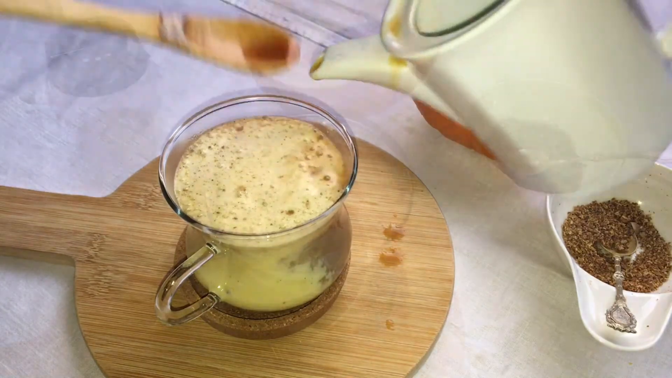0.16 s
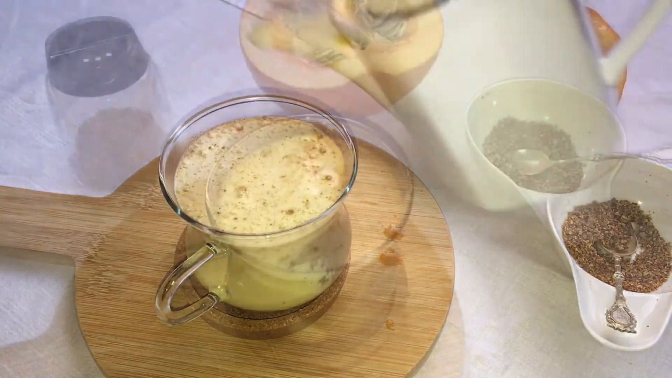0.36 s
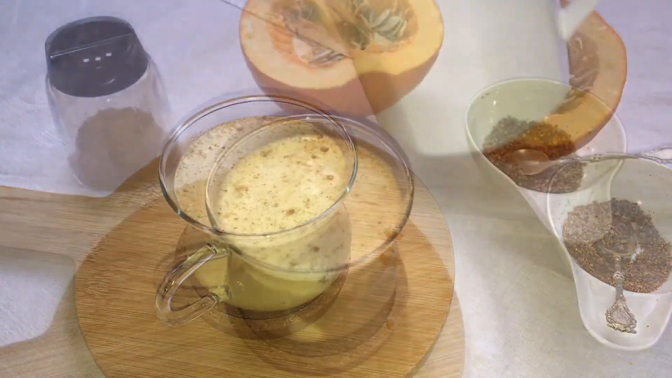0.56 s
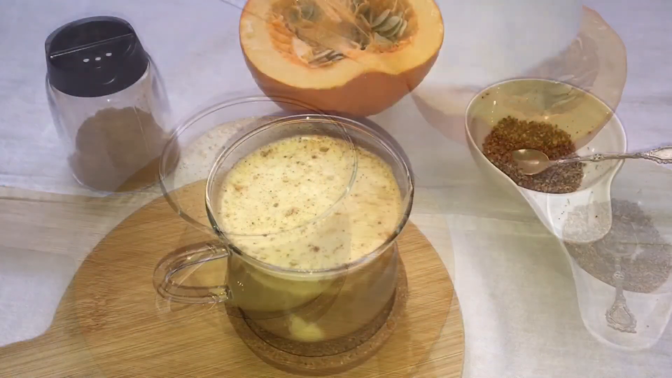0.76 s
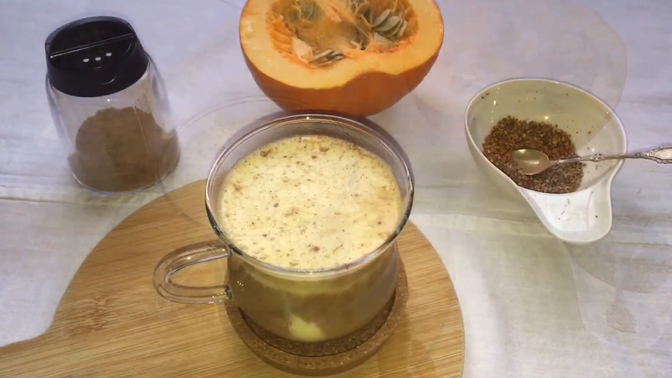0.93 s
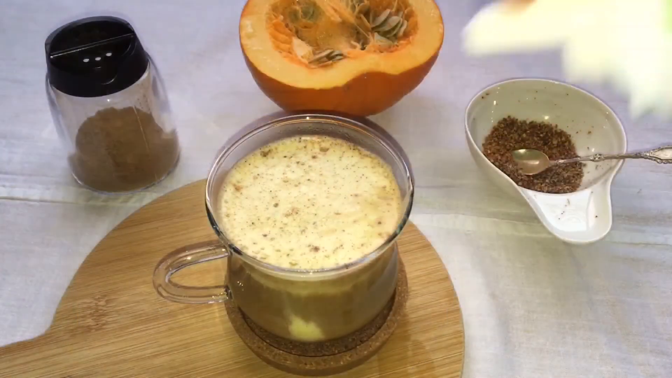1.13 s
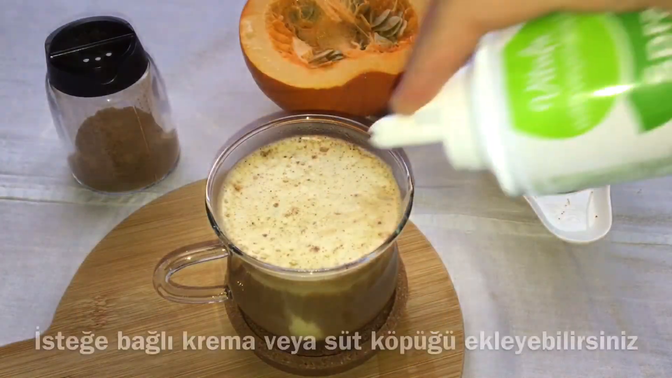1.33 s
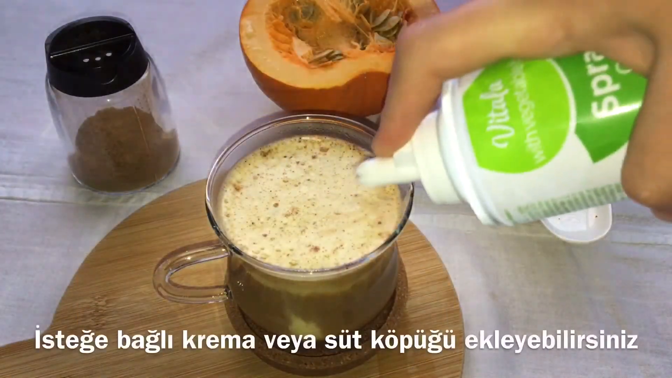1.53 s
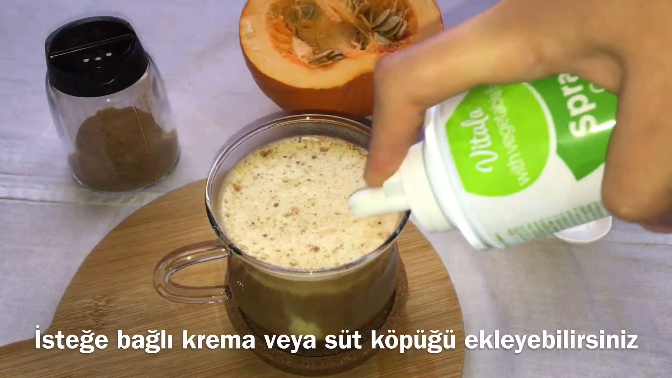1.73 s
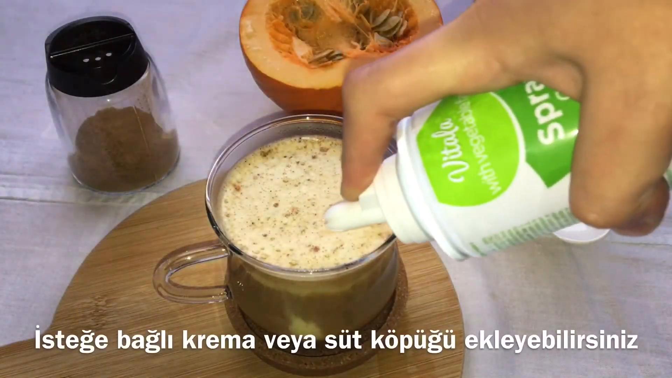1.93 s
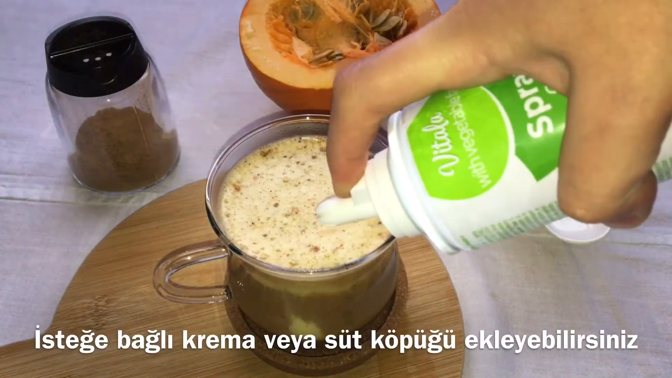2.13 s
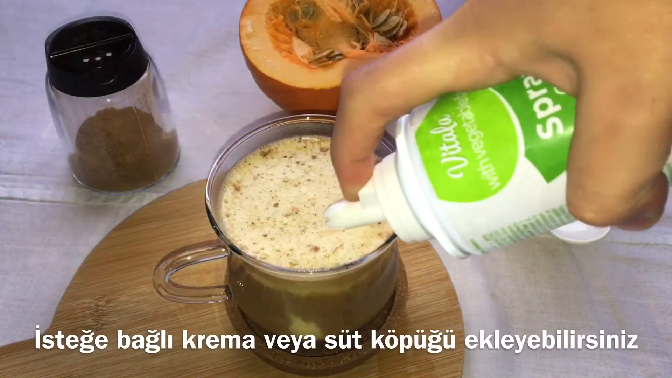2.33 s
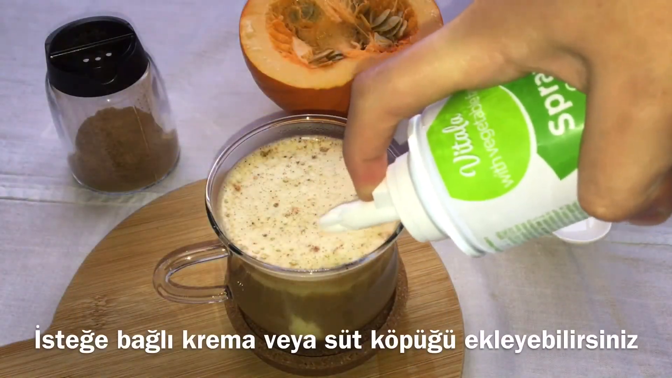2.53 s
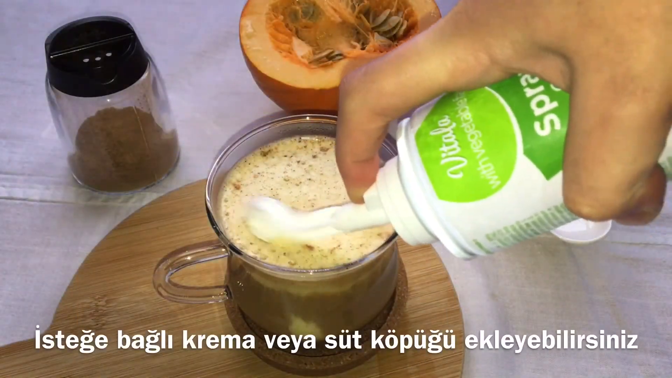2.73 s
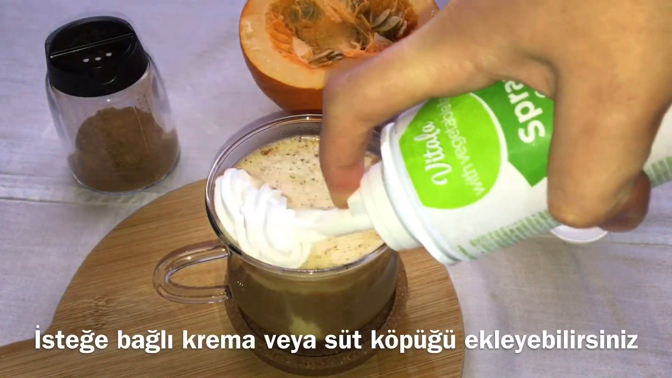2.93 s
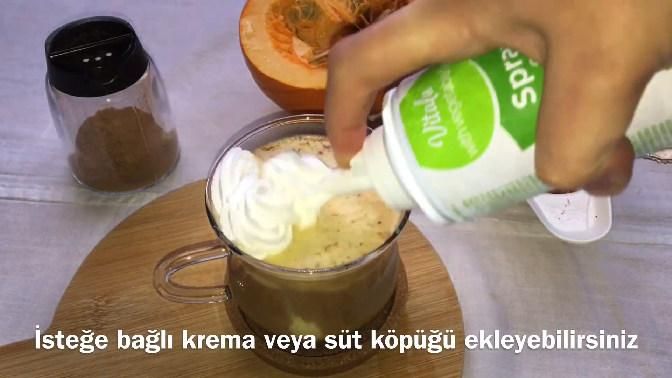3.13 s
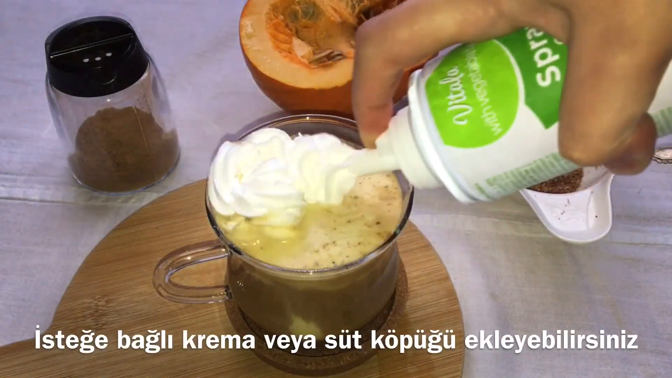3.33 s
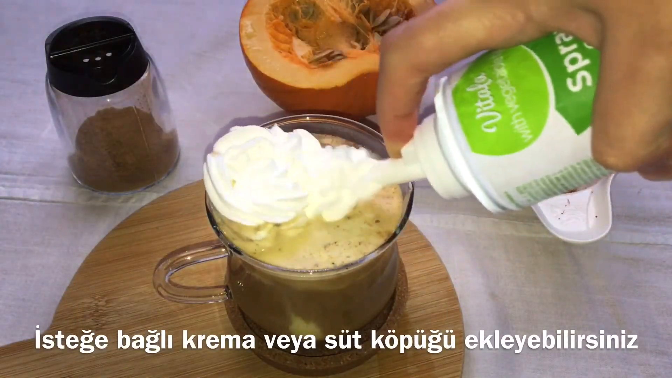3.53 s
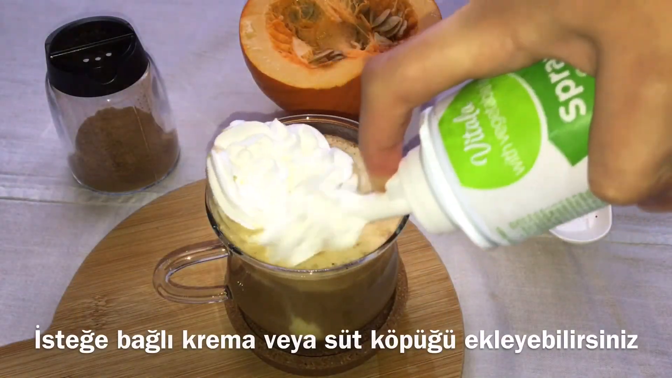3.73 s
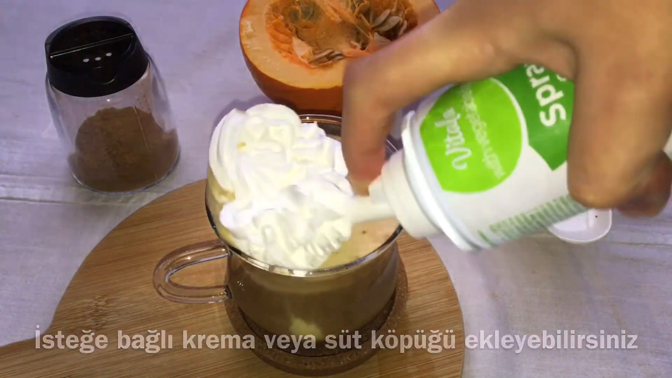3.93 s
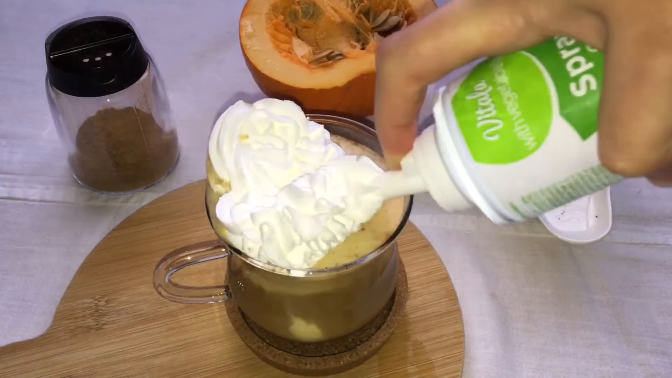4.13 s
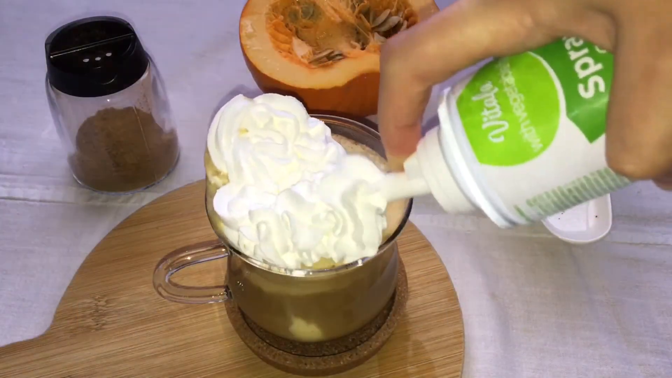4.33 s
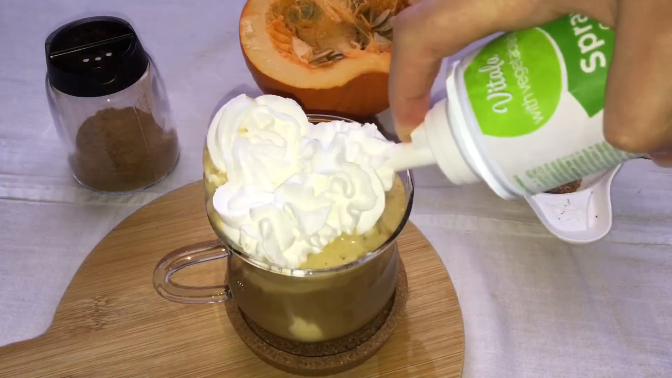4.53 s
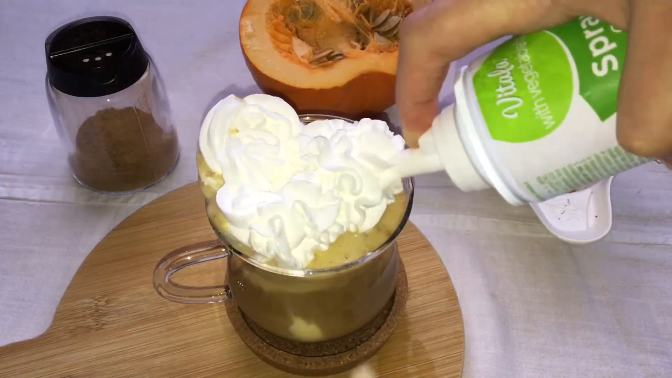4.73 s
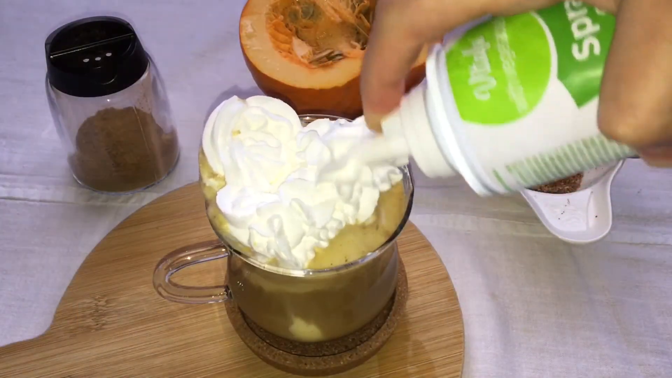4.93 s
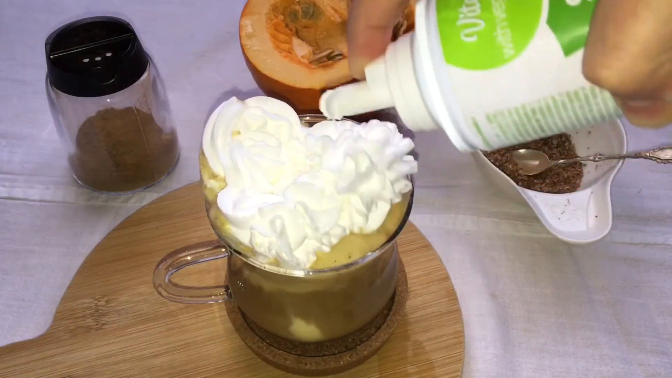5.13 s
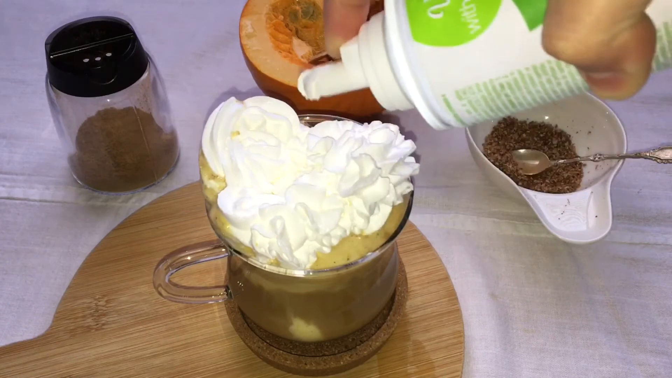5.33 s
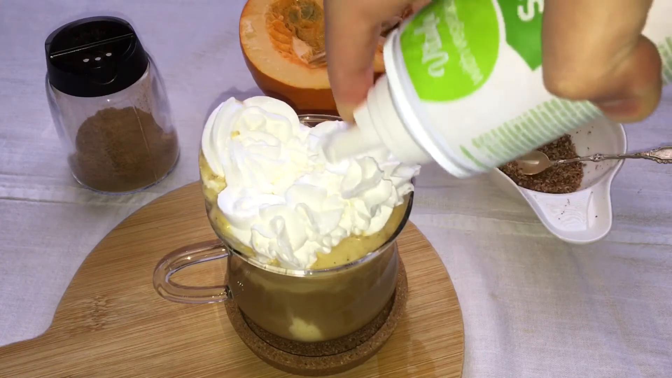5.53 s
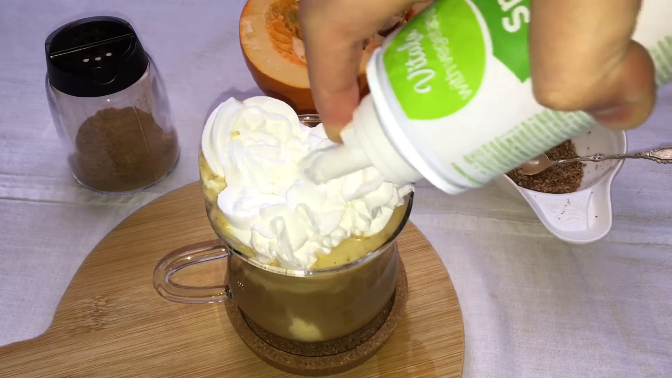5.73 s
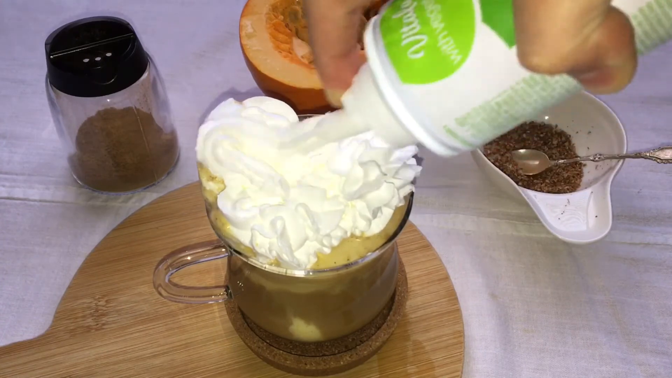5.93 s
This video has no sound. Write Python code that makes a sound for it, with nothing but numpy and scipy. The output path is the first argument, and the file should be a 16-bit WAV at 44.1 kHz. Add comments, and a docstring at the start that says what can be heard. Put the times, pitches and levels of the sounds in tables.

```python
"""Whipped cream is sprayed from an aerosol can onto a drink in a glass mug, in a small kitchen.
Over faint air, rumble and a wavering drone, crockery first clicks, slides and knocks (damped modes,
contact noise and filtered grit), while the table thuds dully (low modes excited by soft blows).
A faint squeak of narrow-band noise swells and fades. Then the valve is pressed twice: gas hisses as
coloured noise, foam fizzes as dense random clicks, and gas pockets sputter and spit as short pops."""
import sys
import numpy as np
from scipy import signal
from scipy.fft import rfft, irfft, next_fast_len
from scipy.io import wavfile
from scipy.ndimage import uniform_filter1d

SR = 44100
rng = np.random.default_rng(int(sys.argv[2]) if len(sys.argv) > 2 else 0)


def to_wav(sig):
    """Store sig (one row per channel, or 1-D mono) as 16-bit WAV at the path in sys.argv[1].

    Samples outside -1..1 are clipped; the rate is SR.
    """
    pcm = np.clip(np.atleast_2d(sig), -1, 1) * 32767
    pcm = np.round(pcm).astype(np.int16)
    wavfile.write(sys.argv[1], SR, pcm.T)  # frames by channels


N = 267246
TIME = np.arange(N) / SR   # s

# Spectral tables give relative density; the level of each source is set separately.
# kitchen air: [f/Hz, density/dB per Hz]
AIR_SPECTRUM = [(240, -44.5), (400, -5.5), (673, -4), (738, -7.5), (1120, -7), (1240, -9), (2290, -14),
                (3680, -16.5), (15500, -20)]
# kitchen rumble: [f/Hz, density/dB per Hz]
RUMBLE_SPECTRUM = [(15, -24), (30, -10), (75, 5.5), (100, -8), (125, 2), (185, -1.5), (250, -3),
                   (350, -9.5), (450, -18.5), (520, -31), (1500, -65.5)]
# deep background drone: [f/Hz, density/dB per Hz]
DRONE_SPECTRUM = [(20, -27), (40, -13.5), (48.5, 4), (58, -11), (85, -13.5), (140, -45), (400, -91)]
# swelling and sinking of the drone: [t/s, level/dB]
DRONE_LEVEL = [(1.7, -70), (2.1, -64.5), (3.2, -63), (4.2, -78.5), (6.05, -73)]
AIR_DB, RUMBLE_DB = -72, -64

# narrow band of the faint squeak: [f/Hz, density/dB per Hz]
SQUEAK_SPECTRUM = [(400, -70), (1200, -12), (1280, -4), (1380, -16), (3000, -72)]

# soft bumps against the table: [t/s, level/dB]
TABLE_BUMPS = [(0.908, -52), (0.955, -54.5), (1.222, -52.5), (1.254, -56.5), (1.535, -41), (1.552, -36.5)]
# modes of the table: [f/Hz, level/dB, t60/s]
TABLE_MODES = [(124.2, -3.5, 0.53), (166, -1, 0.31), (207, -2.5, 0.4), (262, -7, 0.32),
               (332.3, -12.5, 0.37), (385, -19, 0.52), (480, -29.5, 0.38), (613, -25.5, 0.4),
               (770, -37, 0.34)]

# a hard click of crockery: [t/s, level/dB]
CROCKERY_CLICKS = [(0.4667, -37)]
# modes the click excites: [f/Hz, level/dB, t60/s]
CLICK_MODES = [(766, -14, 0.04), (1810, -2.5, 0.012), (2150, -24, 0.18), (2870, -1, 0.015),
               (3080, -4.5, 0.045), (3790, -4.5, 0.051), (5400, -3, .008), (8200, -22, .02)]
# the pot is set down and rocks once: [t/s, level/dB]
POT_KNOCKS = [(0.8434, -35.5), (0.8752, -52)]
# modes of the pot: [f/Hz, level/dB, t60/s]
POT_MODES = [(670, -13, 0.11), (803, 9.5, 0.027), (1729, 0.5, 0.064), (2810, -1, 0.035), (3050, -13, .045),
             (3650, -22, .02), (4430, -30, .015), (6400, -16, 0.014)]
# snap of hard crockery contact: [f/Hz, density/dB per Hz]
SNAP_SPECTRUM = [(200, -15), (800, -6), (1700, -6), (3500, 2), (6000, 4), (7500, -5), (9000, -23),
                 (15000, -30)]
# crockery sliding: [t/s, level/dB, decay time/s, main resonance f/Hz]
CROCKERY_SLIDES = [(0.464, -49, 0.008, 1760), (0.483, -59, 0.082, 2150), (0.61, -66.5, 0.053, 2020),
                   (0.652, -64.5, 0.1, 1960), (0.749, -58.5, 0.02, 2050), (0.9, -67.5, 0.15, 1250),
                   (0.926, -58.5, 0.019, 1190)]
# grit of a slide: [f/Hz, density/dB per Hz]
GRIT_SPECTRUM = [(200, -2), (700, 1.5), (1400, -1.5), (2100, -4), (2700, -6.5), (3800, -7.5), (6000, -10),
                 (9500, -14.5), (15000, -24)]
# lesser resonances that every slide excites: [f/Hz, width/Hz, level/dB]
SLIDE_RESONANCES = [(770, 90, 2), (3080, 140, 5)]

# the finger presses the valve: [start t/s, end t/s, full flow level/dB, initial foam fizz level/dB]
VALVE_PRESSES = [(2.415, 4.801, 0, -40.5), (5.657, 6.1, -2.65, -41.5)]
# the finger eases off, or bears down (negative loss): [start t/s, end t/s, loss of flow level/dB]
FINGER_EASINGS = [(2.4, 2.584, 4), (2.578, 2.70, 14.5), (3.065, 3.157, -1), (4.478, 4.555, 9),
                  (4.564, 4.9, 4.5), (5.73, 5.77, 5)]
# the valve opens from a trickle (relative to full flow); the finger takes a while to shift
TRICKLE_DB, OPENING_S, FINGER_S = -36, 0.077, 0.04

# gas hiss: [f/Hz, density/dB per Hz]
HISS_SPECTRUM = [(700, -36), (1200, -5), (2200, 3), (3000, 2), (4200, -4.5), (4900, -6), (6500, -0.5),
                 (9500, -1), (11400, 2.5), (13000, -3), (15700, -7.5)]
# resonances of the gas jet in the nozzle: [f/Hz, width/Hz, level/dB]
JET_RESONANCES = [(4200, 350, 11.5), (11200, 980, 5)]
# foam fizz: [f/Hz, density/dB per Hz]
FIZZ_SPECTRUM = [(1500, -15.5), (3000, -14.5), (3800, 1), (5000, -2), (6500, -1), (9500, -1), (12000, -8),
                 (15700, -7.5)]
# colour laid on the sputtering pops: [f/Hz, density/dB per Hz]
SPUTTER_SPECTRUM = [(30, -35), (100, -21), (300, -4.5), (520, -17), (850, -9.5), (1000, -2.5), (1300, -3),
                    (2000, 1.64), (2450, 0.6), (2750, -5), (4000, -4.5), (7000, -22), (15000, -22.5)]
# low rush of the moving cream: [f/Hz, density/dB per Hz]
RUSH_SPECTRUM = [(25, -26), (60, -17.5), (130, -5.5), (220, 0), (340, 3), (430, -2), (520, -7.5),
                 (680, -3.5), (900, -14), (2000, -13), (6000, -70)]
# fixed peaks and hollows in the colour of the spray: [f/Hz, width/Hz, level/dB]
SPRAY_PEAKS = [(507, 37, -4), (800, 97, -9), (1000, 76, 4.5), (1125, 107, -5), (1210, 170, 4.5),
               (2450, 55, 2.5), (3580, 500, 3.5), (5310, 190, 4.5), (6620, 150, 0)]
# moving resonance of the hollow in the cream at the nozzle: [t/s, f/Hz]
HOLLOW_PITCH = [(2.45, 1210), (3.15, 2200), (3.5, 2490), (3.7, 1940), (4.8, 1420), (6.05, 1220)]
# loudest pockets spitting from the nozzle: [t/s, pop peak level/dB before the fixed peaks and hollows, f/Hz]
LOUD_SPITS = [(2.48, -35.5, 1580), (2.716, -25, 1970), (3.073, -22, 1900), (3.092, -24, 2000),
              (3.113, -23, 2130), (3.2052, -23, 2500), (3.681, -22.5, 2820), (3.990, -19, 3480),
              (4.064, -26, 1600), (4.437, -21, 3520), (4.5453, -21.5, 1900), (4.5783, -16.5, 1900),
              (4.6238, -20.5, 1820), (4.7185, -17, 2420), (4.7823, -22, 2420), (5.678, -47, 3050),
              (5.7187, -27.5, 1690), (5.762, -26, 1250), (5.783, -25, 1500),  (6.0515, -20.5, 1520)]

HISS_DB, SPUTTER_DB = -41.5, -37.5        # at 0 dB flow; sputter also at the usual hollow pitch
FIZZ_FOLLOWS, SPUTTER_FOLLOWS = 1, 0.91   # dB per dB of flow
FIZZ_GROWTH_DB_PER_S = 3                  # the longer a press lasts, the more the foam fizzes
# a tighter, higher hollow sputters louder
SPUTTER_DB_PER_OCTAVE, USUAL_HOLLOW_HZ = 1.5, 1900
# spread of pocket sizes at 0 dB flow, and its growth per dB of flow lost
POCKET_SPREAD_DB, SPREAD_GROWTH = 3.5, 0.096
# chance spits: rate, mean level above the sputter, and scatter of level and pitch
SPITS_PER_S, SPIT_OVER_DB, SPIT_SCATTER_DB, SPIT_SCATTER_OCTAVES = 10, 12, -1.7, 0.1
# foam damps the jet: dB per dB of fizz above the level at which it rings as listed
JET_DAMPING, JET_FOAM_DB = 0.91, -37.5

ROOM_T60_S, ROOM_DB = 0.33, -10.5   # decay below the treble; feed from the spray to the room
# hollows in the microphone's response: [f/Hz, width/Hz, level/dB]
MICROPHONE_RESPONSE = [(4980, 670, -2.5), (7730, 740, -3), (10380, 790, -3.5)]
CUTOFF_HZ = 15700


def from_db(db):
    """Level definition: amplitude gain is 10 to the power of dB/20."""
    return 10 ** (np.asarray(db) / 20)


def rms_one(x):
    """Normalisation: scale to unit root-mean-square amplitude."""
    return x / np.sqrt(np.mean(x ** 2) + 1e-20)


def in_time(rows):
    """Linear interpolation of a tabulated quantity over time."""
    t, values = np.transpose(rows)
    return np.interp(TIME, t, values)


def colour(x, spectrum):
    """Minimum-phase filtering: a folded cepstrum gives a causal response of the stated magnitude."""
    size = next_fast_len(N + SR // 4, True) * 2
    hz, db = np.transpose(spectrum)
    bins_hz = np.arange(size // 2 + 1) * SR / size
    gain = from_db(np.interp(np.log(bins_hz + 1), np.log(hz), db))
    cepstrum = irfft(np.log(gain))[:size // 2]
    cepstrum[1:] *= 2
    response = np.exp(rfft(cepstrum, size))
    return irfft(rfft(x, size) * response)[:N]


def noise(spectrum):
    """Spectral shaping: white noise coloured by a filter, at unit rms."""
    return rms_one(colour(rng.standard_normal(N), spectrum))


def drift(rate_hz):
    """Low-pass filtering: two equal poles turn white noise into a smooth fluctuation of unit rms."""
    r = np.exp(-2 * np.pi * rate_hz / SR)
    return rms_one(signal.lfilter([1], [1, -2 * r, r * r], rng.standard_normal(N)))


def ring(clicks, hz, t60):
    """Impulse response: a unit click sets a damped mode of height 1 ringing."""
    r, w = from_db(-60 / (t60 * SR)), 2 * np.pi * hz / SR
    # the tiny offset avoids vanishingly small numbers
    return signal.lfilter([1, -r * np.cos(w)], [1, -2 * r * np.cos(w), r * r], clicks + 1e-18)


def bursts(per_s, spread_db, limit=4.57):
    """Random point process: clicks of either sign, mostly small and a few large."""
    sizes = from_db(spread_db * np.minimum(rng.exponential(1, N), limit))
    return (rng.random(N) < per_s / SR) * sizes * rng.choice([-1, 1], N)


def steady(x):
    """Gain control: division by the running rms (about 50 ms) holds the level near 1."""
    return x / np.sqrt(uniform_filter1d(x ** 2, size=2200) + 1e-12)


def bell(hz, width, db):
    """Second-order resonance: filter coefficients of one peak or hollow."""
    half, g, c = np.pi * width / SR, from_db(db / 2), -2 * np.cos(2 * np.pi * hz / SR)
    return [1 + half * g, c, 1 - half * g], [1 + half / g, c, 1 - half / g]


def bells(x, rows):
    """Cascaded filters: the responses of successive peaks and hollows multiply."""
    for row in rows:
        x = signal.lfilter(*bell(*row), x)
    return x


def struck(hits, modes, rise_cycles):
    """Modal superposition: each blow starts damped sines that build up over some cycles."""
    out = np.zeros(N)
    for s, db in hits:
        start = round(s * SR)
        age = TIME[:min(SR, N - start)]
        for hz, mode_db, t60 in modes:
            swell = 1 - np.exp(-age * hz / rise_cycles)
            fade = np.exp(-np.log(1000) * age / t60)
            mode = swell * fade * np.sin(2 * np.pi * hz * age)
            out[start:][:len(age)] += from_db(db + mode_db) * mode
    return out


def background():
    """Incoherent addition: independent noises form faint air, low rumble and a wavering drone."""
    air = from_db(AIR_DB) * noise(AIR_SPECTRUM)
    rumble = from_db(RUMBLE_DB) * noise(RUMBLE_SPECTRUM)
    drone = from_db(in_time(DRONE_LEVEL)) * noise(DRONE_SPECTRUM)
    return air + rumble + drone


def squeak(peak_s=2.235, width_s=0.089, peak_db=-74):
    """Amplitude modulation: a bell-shaped envelope makes narrow-band noise swell and fade."""
    envelope = np.exp(-((TIME - peak_s) / width_s) ** 2)
    return from_db(peak_db) * envelope * noise(SQUEAK_SPECTRUM)


def table_thuds():
    """Soft excitation: slow-rising blows set the table's low modes ringing."""
    return struck(TABLE_BUMPS, TABLE_MODES, rise_cycles=2.7)


def snaps(hits, snap_db, snap_s=0.0013):
    """Impulsive contact: hard surfaces give a broadband crack about a millisecond long."""
    force = np.zeros(N)
    for s, db in hits:
        force += from_db(db + snap_db) * (TIME > s) * np.exp(-np.abs(TIME - s) / snap_s)
    return force * noise(SNAP_SPECTRUM)


def slides(grain_db=0.5, ring_width_hz=200, ring_db=12):
    """Friction excitation: gritty scrapes catch quickly and die away, each with its own resonance."""
    grit = bells(colour(bursts(4000, grain_db), GRIT_SPECTRUM), SLIDE_RESONANCES)
    out = np.zeros(N)
    for s, db, decay_s, hz in CROCKERY_SLIDES:
        age = np.maximum(TIME - s, 0)
        pressure = from_db(db) * (1 - np.exp(-age / 0.002)) * np.exp(-age / decay_s)
        out += pressure * rms_one(bells(grit, [(hz, ring_width_hz, ring_db)]))
    return out


def crockery():
    """Contact and modal response: clicks and knocks ring and snap, and slides scrape."""
    clicks = struck(CROCKERY_CLICKS, CLICK_MODES, rise_cycles=0.61) + snaps(CROCKERY_CLICKS, snap_db=-2.0)
    knocks = struck(POT_KNOCKS, POT_MODES, rise_cycles=1.0) + snaps(POT_KNOCKS, snap_db=-11.5)
    return clicks + knocks + slides()


def finger():
    """Flow control: give valve opening (0-1), flow (dB) and foam fizz at 0 dB flow (dB)."""
    valve, flow_db, foam_db = np.zeros((3, N))
    for on, off, full_db, start_db in VALVE_PRESSES:
        age, touched = np.maximum(TIME - on, 0), TIME > on - FINGER_S
        valve += (TIME > on) * (TIME < off)
        opening_db = TRICKLE_DB * np.exp(-(age / OPENING_S) ** 2)
        flow_db = np.where(touched, full_db + opening_db, flow_db)
        foam_db = np.where(touched, start_db + FIZZ_GROWTH_DB_PER_S * age, foam_db)
    eased_db = sum(loss_db * (TIME > on) * (TIME < off) for on, off, loss_db in FINGER_EASINGS)
    flow_db = flow_db - uniform_filter1d(eased_db, size=int(FINGER_S * SR))
    return uniform_filter1d(valve, size=130), flow_db, foam_db


def gas_hiss(flow_db, foam_db, surge):
    """Jet noise: turbulent gas excites nozzle resonances, which foam damps."""
    gas = noise(HISS_SPECTRUM)
    resonance = bells(gas, JET_RESONANCES) - gas
    jet = gas + from_db(JET_DAMPING * (JET_FOAM_DB - foam_db)) * resonance
    return from_db(HISS_DB + flow_db) * steady(bells(jet, SPRAY_PEAKS) * np.sqrt(surge))


def foam_fizz(fizz_db, spread_db, surge, per_s=6000):
    """Shot noise: many random clicks merge into the fizz of foam."""
    clicks = bursts(per_s, spread_db) * surge
    return from_db(fizz_db) * steady(bells(colour(clicks, FIZZ_SPECTRUM), SPRAY_PEAKS))


def low_rush(sputter_db, surge, rush_db=-36.5, growth=0.34, under_db=4.0):
    """Flow noise: the low rush of moving cream levels off once the flow is established."""
    level_db = np.minimum(rush_db + growth * sputter_db, sputter_db - under_db)
    return from_db(level_db) * noise(RUSH_SPECTRUM) * surge


def cavity(x, hollow_hz, width=420, boost_db=2.5, size=512):
    """Cavity resonance: fixed peaks and hollows colour the spray, then a hollow that moves as the heap grows."""
    x, out, state = bells(x, SPRAY_PEAKS), np.zeros(N), np.zeros(2)
    for i in range(0, N, size):
        hollow = bell(hollow_hz[i], width, boost_db)
        out[i:i + size], state = signal.lfilter(*hollow, x[i:i + size], zi=state)
    return out


def sputter(spread_db, surge, per_s=2400, cycles=3.4, count=10):
    """Damped oscillation: bursting gas pockets pop for a few cycles at one of several pitches."""
    pops = bursts(per_s, spread_db) * surge
    dealt = rng.integers(0, count, N)
    rings = np.zeros(N)
    for k, hz in enumerate(np.geomspace(1050, 2900, count)):
        rings += ring(pops * (dealt == k), hz, cycles / hz)
    return colour(rings, SPUTTER_SPECTRUM)


def lesser_spits(valve, sputter_db, hollow_hz):
    """Random arrivals: rows [t/s, level/dB, f/Hz] of chance spits while the valve is open."""
    at = np.flatnonzero(rng.random(N) < valve * SPITS_PER_S / SR)
    size, pitch = rng.standard_normal((2, N))[:, at]
    level_db = sputter_db[at] + SPIT_OVER_DB + SPIT_SCATTER_DB * size
    hz = hollow_hz[at] * 2 ** (SPIT_SCATTER_OCTAVES * pitch)
    return list(zip(at / SR, level_db, hz))


def spits(rows, swell_cycles=0.36, puff_hz=320, puff_db=-19, mist_db=-17, mist_s=0.0013):
    """Transient release: a large pocket gives a short pop, a low puff and a tick of droplets."""
    out, age = np.zeros(N), TIME[:SR // 50]

    def pop(hz):
        """Damped oscillation: swell and die within a few cycles under an envelope of height 1."""
        stage = age * hz / swell_cycles
        return stage * np.exp(1 - stage) * np.sin(2 * np.pi * hz * age)

    for (s, db, hz), white in zip(rows, rng.standard_normal((len(rows), len(age)))):
        mist = from_db(mist_db) * white * np.exp(-age / mist_s)
        spit = from_db(db) * (pop(hz) + from_db(puff_db) * pop(puff_hz) + mist)
        start = min(round(s * SR), N - 1)
        out[start:start + len(age)] += spit[:N - start]
    return bells(out, SPRAY_PEAKS)


def spray(surge_db=1.5, gurgle_db=1.1):
    """Two-phase flow: the open valve lets out gas and foam in quick uneven surges."""
    valve, flow_db, foam_db = finger()
    hollow_hz = in_time(HOLLOW_PITCH)
    hollow_gain_db = SPUTTER_DB_PER_OCTAVE * np.log2(hollow_hz / USUAL_HOLLOW_HZ)
    sputter_db = SPUTTER_DB + SPUTTER_FOLLOWS * flow_db + hollow_gain_db
    spread_db = POCKET_SPREAD_DB - SPREAD_GROWTH * flow_db
    surge = from_db(surge_db * drift(90))
    hiss = gas_hiss(flow_db, foam_db, surge)
    fizz = foam_fizz(foam_db + FIZZ_FOLLOWS * flow_db, spread_db, surge)
    pops_gain = from_db(sputter_db + gurgle_db * drift(8.3))
    pops = pops_gain * steady(cavity(sputter(spread_db, surge), hollow_hz))
    rush = low_rush(sputter_db, surge)
    all_spits = list(LOUD_SPITS) + lesser_spits(valve, sputter_db, hollow_hz)
    return valve * (hiss + fizz + pops + rush) + spits(all_spits)


def kitchen(x, treble_t60_s=0.26, treble_db=-4, first_echo_s=.006):
    """Reverberation: diffuse wall echoes decay exponentially, the treble sooner."""
    age = TIME[:SR * 3 // 4]
    white = rng.standard_normal(len(age)) * (age > first_echo_s)
    low = signal.lfilter(*signal.butter(1, 3000, fs=SR), white)
    low_tail = low * np.exp(-np.log(1000) * age / ROOM_T60_S)
    treble_tail = from_db(treble_db) * (white - low) * np.exp(-np.log(1000) * age / treble_t60_s)
    scale = np.sqrt(ROOM_T60_S * SR / (2 * np.log(1000)))
    return signal.fftconvolve(x, (low_tail + treble_tail) / scale)[:N]


def scene(crockery_room_db=-16):
    """Superposition: direct sounds add to the echoes of spray and crockery and to the background."""
    dishes = crockery()
    can = spray()
    echoes = kitchen(from_db(ROOM_DB) * can + from_db(crockery_room_db) * dishes)
    return (background() + squeak() + table_thuds() + dishes + can + echoes)[None]


def record(dry):
    """Transducer response: the microphone colours the treble, and the top is cut steeply."""
    heard = bells(dry, MICROPHONE_RESPONSE)
    return signal.sosfilt(signal.ellip(12, .1, 80, CUTOFF_HZ, fs=SR, output="sos"), heard)


dry = scene()
out = record(dry)
to_wav(out)
```